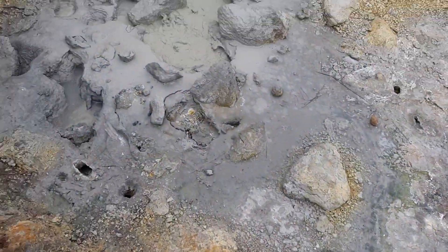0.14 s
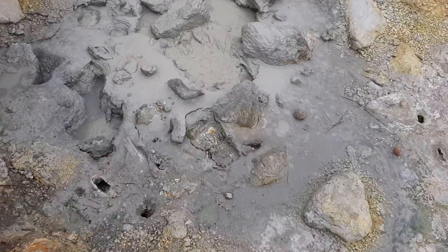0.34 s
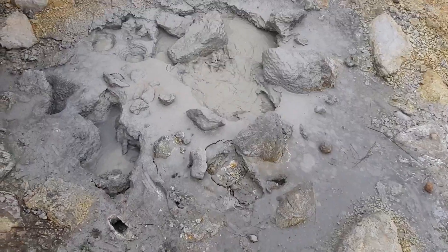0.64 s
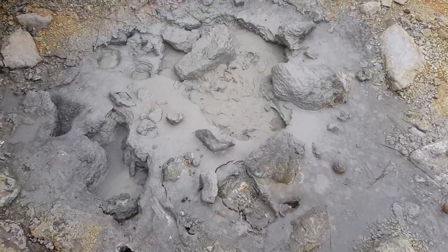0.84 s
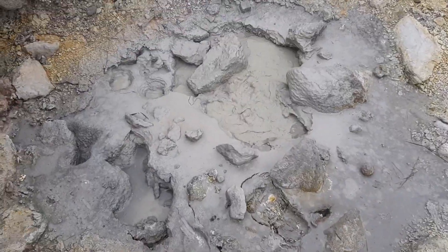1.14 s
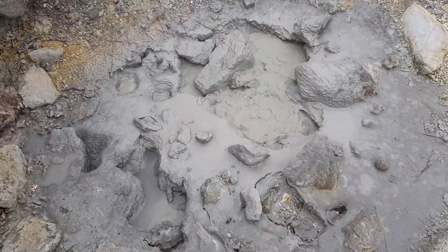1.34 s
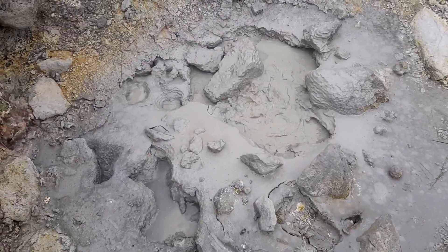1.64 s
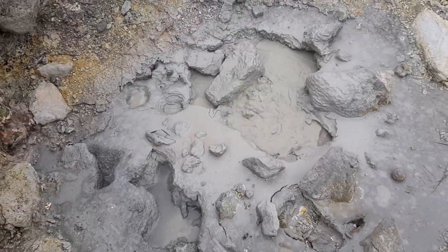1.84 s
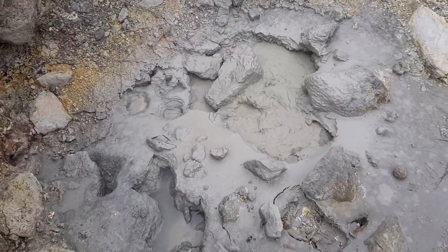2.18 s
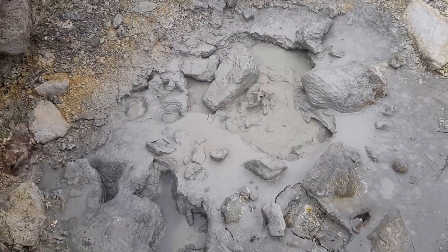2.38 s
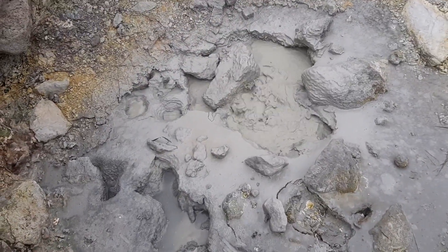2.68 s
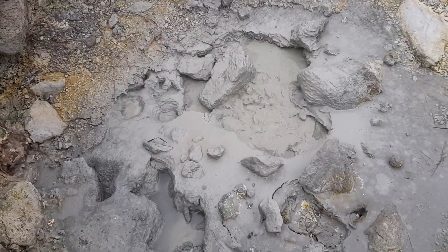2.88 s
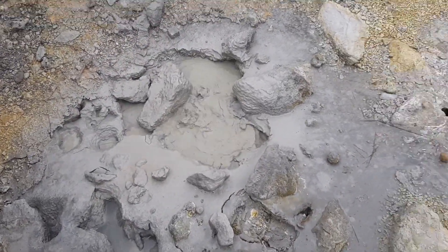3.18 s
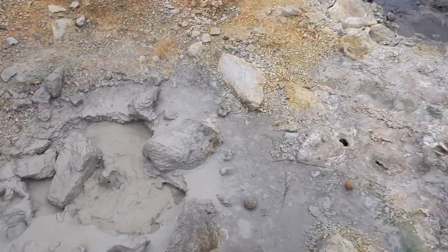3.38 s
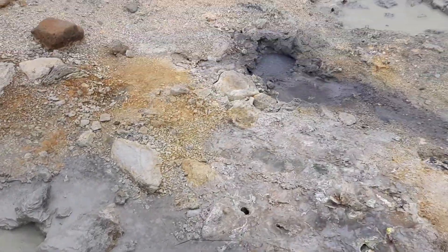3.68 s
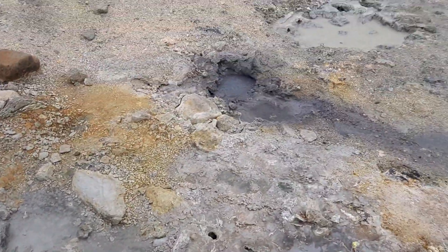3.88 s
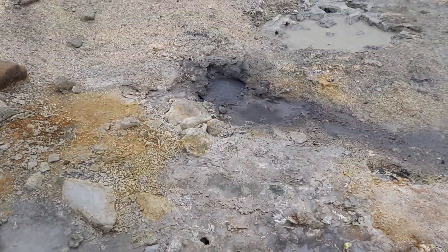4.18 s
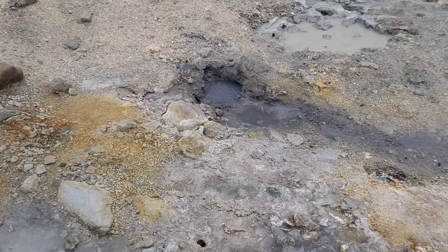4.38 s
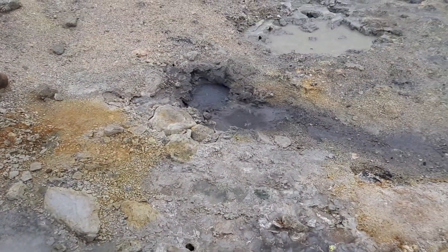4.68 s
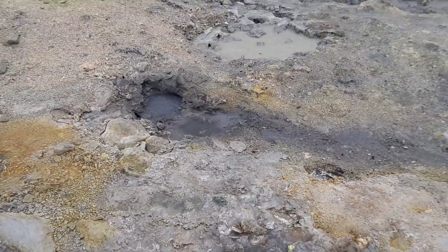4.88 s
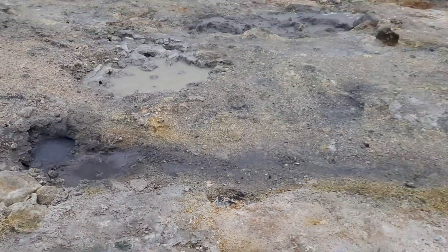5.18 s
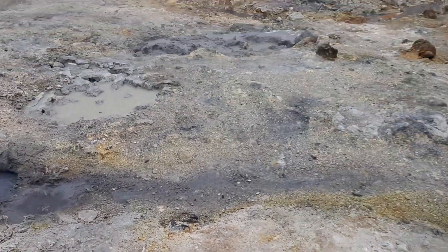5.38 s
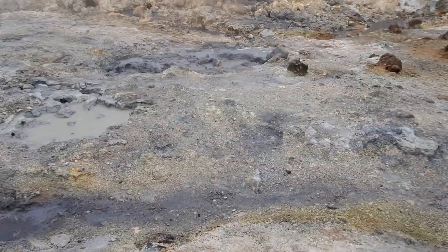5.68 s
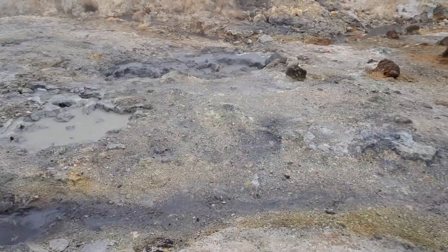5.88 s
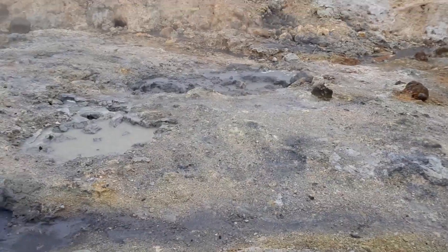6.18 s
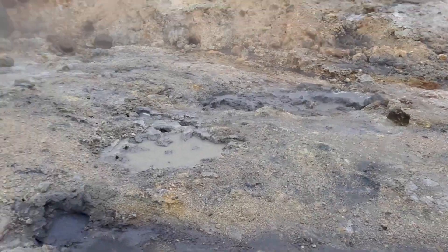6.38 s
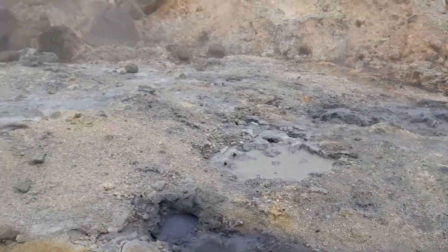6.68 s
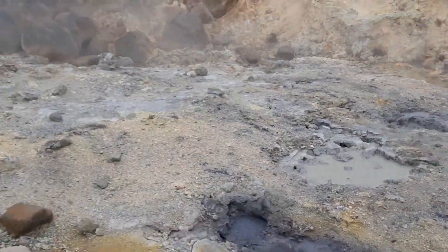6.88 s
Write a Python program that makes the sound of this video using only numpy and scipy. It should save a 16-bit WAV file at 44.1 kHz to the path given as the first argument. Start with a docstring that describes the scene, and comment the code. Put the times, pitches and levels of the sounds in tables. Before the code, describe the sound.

Steam vents rumble steadily outdoors while steam fizzes through wet mud and far jets hiss faintly. Gusts buffet the left side of a handheld microphone early on, as low plops give way to scattered pops and small splatters. A big bubble cracks loudly near the middle, followed by a flurry of crisp, higher snaps on the right. More wind bumps the right side as the mud keeps boiling.

```python
"""Mud pots boil in an open steam field: bubbles plop, pop and crack, and wet mud spatters.
Steam fizzes through the mud and rings in its hollows, over a deep vent roar and under the hiss
of far jets. A turning handheld microphone hears it through two ports; the left one faces away.
Gusts of wind thump mostly on the left port at first, later mostly on the right."""
import sys
import numpy as np
from scipy import signal
from scipy.fft import rfft, irfft
from scipy.io import wavfile
from scipy.ndimage import uniform_filter1d

SR = 44100
rng = np.random.default_rng(int(sys.argv[2]) if len(sys.argv) > 2 else 0)


def generate_wav(signal):
    """Clip the signal to [-1, 1] and save it as 16-bit WAV at the path in sys.argv[1]."""
    frames = np.transpose(np.atleast_2d(signal))
    scaled = np.clip(frames, -1, 1) * 32767
    pcm = np.round(scaled).astype(np.int16)
    wavfile.write(sys.argv[1], SR, pcm)


N = 310023
TIME_S = np.arange(N) / SR
RING_SAMPLES = 1200


def gain_of(db):
    """Decibels to amplitude."""
    return 10 ** (np.asarray(db) / 20)


def port_gains(db, left_db):
    """Left and right gains, the left offset by left_db."""
    return gain_of(db + np.array([[left_db], [0]]))


def unit_rms(x):
    """Scale to rms 1."""
    return x / np.sqrt(np.mean(x ** 2) + 1e-20)


def wander(shape, steps):
    """Smoothed random drift, rms 1."""
    return unit_rms(uniform_filter1d(rng.standard_normal(shape), steps))


def at_hz(table, hz):
    """Interpolate a table over log frequency."""
    f, value = np.transpose(table)
    return np.interp(np.log(hz + 1), np.log(f + 1), value)


def at_time(table, column, t):
    """Interpolate one column over time."""
    rows = np.array(table)
    return np.interp(t, rows[:, 0], rows[:, column])


def band(x, hz, width_hz):
    """Band-pass, rms 1."""
    edges_hz = np.clip([hz - width_hz / 2, hz + width_hz / 2], 40, SR / 2.2)
    return unit_rms(signal.sosfilt(signal.butter(3, edges_hz, "band", fs=SR, output="sos"), x))


def port_noise(size, colour_db, patchy_db, flicker_db, coherence=None, lead_s=0):
    """Two-port noise shaped by colour_db(hz, t), with drifting patches and flicker; right rms 1."""
    hop = size // 4
    frames, hz = N // hop + 5, np.fft.rfftfreq(size, 1 / SR)
    a, b, c, d, patches = rng.standard_normal((frames, len(hz), 5)).T
    patches = unit_rms(uniform_filter1d(uniform_filter1d(patches, 9, axis=0), 9, axis=1))
    flicker = wander(frames, 5)
    shared = 0 if coherence is None else at_hz(coherence, hz)[:, None]
    right, unrelated = a + 1j * b, c + 1j * d
    early = right * np.exp(2j * np.pi * hz * lead_s)[:, None]
    spectra = np.array([shared * early + np.sqrt(1 - shared ** 2) * unrelated, right])
    level_db = colour_db(hz[:, None], np.arange(frames) * hop / SR)
    spectra *= gain_of(level_db + patchy_db * patches + flicker_db * flicker)
    out = signal.istft(spectra, nperseg=size, noverlap=size - hop)[1][:, :N]
    return out / np.sqrt(np.mean(out[1] ** 2))


def resonance(offset_hz, width_hz):
    """Resonance curve, peak 1."""
    return 1 / (1 + (2 * offset_hz / width_hz) ** 2)


def burst(hz, width_hz, length_s, grit):
    """A bubble wall snaps: a few cycles swell and die; long, wide bursts tear into spray."""
    t = np.arange(len(grit)) / SR
    snap, tear = t * width_hz * 2.05, 2 * t / length_s
    torn = np.clip((width_hz * length_s - 2.2) / 2, 0, 1)
    ring = (1 - 0.62 * torn) * snap ** 2 * np.exp(2 - 2 * snap) * np.sin(2 * np.pi * hz * t)
    spray = band(grit, hz, 1.87 * width_hz)
    trail = 0.08 * np.minimum(snap, 1) * np.exp(-t / 0.0078)
    return ring + spray * (0.27 * torn * tear * np.exp(1 - tear) + trail)


# Roar spectrum: f/Hz, level/dB
ROAR_SPECTRUM = [(25, 5.5), (50, -11.5), (100, 1.5), (180, -3.5), (260, -0.5), (330, -7), (400, -6),
                 (520, -12.5), (800, -15), (980, -19.5), (1120, -26.5), (1400, -33), (2500, -48.5)]
# Roar likeness between ports: f/Hz, coherence
ROAR_COHERENCE = [(60, 0.88), (130, 0.99), (290, 0.93), (640, 0.37), (1400, 0.077)]
# Roar while turning: t/s, middle boost/dB, upper boost/dB
ROAR_TURN = [(0, 4.5, 0), (.3, -1, 1.5), (1.2, 1.5, 1), (1.8, 3, 1.5), (3.2, 3.5, 0.5), (3.6, 0, 4.5),
             (5, 0.5, 5.5), (5.6, 0, 5.5), (6.5, -0.5, 5), (7.03, 0, 6)]
# Ringing of the hollows: t/s, fizz resonance strength, roar boost at 900 Hz/dB
HOLLOW_STRENGTH = [(0, 0.5, 6.5), (.6, 0.7, 4.5), (1.2, 0.6, 5), (1.6, 0.83, 1.5), (2.6, 0.9, 1.5),
                   (3.3, 0.77, -0.5), (4.2, 1.02, -2.5), (5, 0.9, 0), (6, 0.92, -2.5), (7.03, 1, 1.5)]
def vent_roar():
    """Vents roar low; the middle and upper bands shift as the microphone turns."""
    def colour_db(hz, t):
        upper = 1 / (1 + (520 / (hz + 1)) ** 6)
        middle = 1 - upper - 1 / (1 + (hz / 220) ** 6)
        turn_db = at_time(ROAR_TURN, 1, t) * middle + at_time(ROAR_TURN, 2, t) * upper
        hollow_db = at_time(HOLLOW_STRENGTH, 2, t) * np.exp(-(2 * (hz - 900) / 280) ** 2)
        return at_hz(ROAR_SPECTRUM, hz) + turn_db + hollow_db
    roar = port_noise(1024, colour_db, patchy_db=1, flicker_db=0.35,
                      coherence=ROAR_COHERENCE, lead_s=4 / SR)
    return roar * port_gains(-33.5, left_db=-2.5)


LEFT_LEAD_SAMPLES = 14
# Fizz spectrum: f/Hz, level/dB
FIZZ_SPECTRUM = [(500, -14), (1100, -1.5), (2500, 2), (3300, -3), (4300, 0.5), (6200, -1), (7200, -11.5),
                 (9000, -30), (12000, -54)]
# Fizz likeness between ports: f/Hz, coherence
FIZZ_COHERENCE = [(1000, 0.17), (2000, 0.28), (3500, 0.038), (7000, 0.022)]
# Resonances of the hollows: f/Hz, width/Hz, gain/dB
HOLLOW_MODES = [(1535, 42, 8.5), (2026, 65, 7.5), (2770, 100, 2.5), (6120, 920, -2.5)]
# Shading of the left port: f/Hz, left minus right/dB
LEFT_SHADE = [(900, -0.5), (1500, -5), (2400, -12.5), (4400, -10), (6000, -10), (7200, 2)]
# Vigour of the boil: t/s, fizz level/dB, jet level/dB
BOIL_LEVELS = [(0, -44.5, -59), (.39, -44.5, -60.5), (.74, -43.5, -57.5), (.95, -45, -58.5),
               (1.3, -46, -57.5), (1.45, -44, -58), (1.94, -45, -59.5), (2.58, -43, -57.5),
               (3.09, -45, -58), (3.58, -42, -59), (3.75, -41, -55.5), (4.19, -42.5, -57),
               (4.62, -42, -56.5), (5.5, -42.5, -56), (6.03, -42.5, -58), (6.56, -42, -57),
               (7.03, -43, -58)]
def steam_fizz():
    """Steam through wet mud: dense resonant hiss and tiny bubbles, shaded at the left port."""
    def colour_db(hz, t):
        drifts, flutters = wander((2, len(HOLLOW_MODES), len(t)), 7)
        modes_db = sum(db * (1 + 0.5 * flutter) * resonance(hz - f * (1 + 0.012 * drift), width_hz)
                       for (f, width_hz, db), drift, flutter in zip(HOLLOW_MODES, drifts, flutters))
        shade_db = np.array([at_hz(LEFT_SHADE, hz), 0 * hz])
        return at_hz(FIZZ_SPECTRUM, hz) + at_time(HOLLOW_STRENGTH, 1, t) * modes_db + shade_db
    steam = port_noise(2048, colour_db, patchy_db=1.2, flicker_db=0.35,
                       coherence=FIZZ_COHERENCE, lead_s=LEFT_LEAD_SAMPLES / SR)
    sizes = gain_of(6.5 * np.minimum(rng.exponential(1, N), 2.4))
    onsets = sizes * (rng.random(N) < 400 / SR)  # 400 bubbles/s
    pitch_index, grit = rng.integers(0, 16, N), rng.standard_normal((16, 700))
    bubbles = np.zeros((2, N))
    for k, hz in enumerate(np.geomspace(700, 5500, 16)):
        bubble = burst(hz, width_hz=880, length_s=0.00099, grit=grit[k])
        train = signal.oaconvolve(onsets * (pitch_index == k), bubble)[:N]
        bubbles += [gain_of(at_hz(LEFT_SHADE, hz)) * np.roll(train, -LEFT_LEAD_SAMPLES), train]
    return (steam + gain_of(-10) * unit_rms(bubbles)) * gain_of(at_time(BOIL_LEVELS, 1, TIME_S))


# Jet spectrum: f/Hz, level/dB
JET_SPECTRUM = [(5000, -26), (8000, -10.5), (11500, 4), (13500, 1), (15800, -3.5)]
# Steam puffs: t/s, length/s, level/dB, f/Hz, left minus right/dB
STEAM_PUFFS = [(.7, .09, -59, 12000, 0), (1.2, 0.18, -57, 12500, 1), (2.42, 0.084, -56, 13200, -16),
               (3.666, 0.089, -48.5, 13000, -16)]
def steam_jets():
    """Far jets hiss from all around; small holes let out short puffs."""
    hiss = port_noise(256, lambda hz, t: at_hz(JET_SPECTRUM, hz), patchy_db=1.8, flicker_db=0.45)
    out = hiss * gain_of(at_time(BOIL_LEVELS, 2, TIME_S))
    for start_s, length_s, db, hz, left_db in STEAM_PUFFS:
        puff = band(rng.standard_normal((2, N)), hz, width_hz=4000)
        gate = np.clip(np.minimum(TIME_S - start_s, start_s + length_s - TIME_S) / 0.008, 0, 1)
        out += port_gains(db, left_db) * puff * gate
    return out


def mud_plops(per_s, db, left_db, range_hz):
    """Slow, larger bubbles plop at random under the surface."""
    sizes = gain_of(5.4 * np.minimum(rng.exponential(1, N), 3))
    onsets = sizes * (rng.random(N) < per_s / SR)
    pitch_index, grit = rng.integers(0, 8, N), rng.standard_normal((8, RING_SAMPLES))
    plops = np.zeros(N)
    for k, hz in enumerate(np.geomspace(*range_hz, 8)):
        plop = burst(hz, width_hz=0.4 * hz, length_s=0.0097, grit=grit[k])
        plops += signal.oaconvolve(onsets * (pitch_index == k), plop)[:N]
    return port_gains(db, left_db) * unit_rms(plops)


# Wind thumps: centre t/s, level/dB, length/s, port L or R
WIND_THUMPS = [(0.04, -32.5, 0.098, "L"), (0.077, -33, .07, "R"), (0.215, -32, 0.075, "L"),
               (0.605, -25.5, 0.13, "L"), (0.677, -29, 0.16, "L"), (0.73, -23, 0.054, "L"),
               (0.771, -21.5, 0.078, "L"), (0.891, -18, 0.097, "L"), (0.972, -22, 0.22, "L"),
               (1.079, -15.5, 0.053, "L"), (1.123, -23, 0.049, "L"), (1.193, -35, .07, "R"),
               (1.236, -22.5, 0.09, "L"), (1.288, -21.5, 0.046, "L"), (1.485, -27, 0.26, "L"),
               (2.09, -32.5, 0.21, "R"), (3.62, -38, 0.11, "L"), (3.762, -29, .1, "R"),
               (3.81, -29, 0.11, "L"), (3.94, -34, 0.04, "R"), (4.255, -27, 0.2, "R"),
               (4.402, -33, 0.26, "L"), (4.744, -31, 0.055, "L"), (5.086, -18.5, 0.18, "R"),
               (5.143, -31, .09, "L"), (5.151, -26.5, 0.18, "R"), (5.314, -31.5, 0.16, "R"),
               (5.49, -36, 0.057, "R"), (5.748, -26.5, 0.21, "R"), (5.91, -29.5, 0.22, "R"),
               (6.092, -34.5, 0.46, "L"), (6.3, -36, 0.54, "R"), (6.56, -30, 0.16, "R"),
               (6.59, -29, 0.11, "L"), (6.673, -25.5, 0.17, "R"), (6.8, -33, 0.24, "R"),
               (6.95, -35, 0.15, "R")]
def wind_level_db(port, t, breeze_db):
    """Pressure on one port: breeze plus arched thumps, 19.5 dB down at their ends."""
    power = gain_of(2 * breeze_db)
    for centre_s, db, length_s, side in WIND_THUMPS:
        if side == port:
            arch_db = -19.5 * np.minimum(2 * abs(t - centre_s) / length_s, 3) ** 2
            power += gain_of(2 * (db + arch_db))
    return 10 * np.log10(power)


CALM_DB, PITCH_RISE_PER_DB, LEFT_PITCH_RATIO = -39, 0.018, 0.7
# Calm wind spectrum, right port: f/Hz, level/dB
WIND_SPECTRUM = [(20, 4.5), (40, 0), (70, 1.5), (110, -1.5), (160, -18), (300, -21), (600, -36),
                 (1200, -66)]
def wind():
    """Lumpy pressure, unrelated at the two ports; strong gusts sound higher."""
    t = TIME_S[::64]
    swings = unit_rms(uniform_filter1d(wander((2, len(t)), 50), 50))
    levels_db = [wind_level_db(port, t, breeze_db=-48 + 3 * swing) for port, swing in zip("LR", swings)]

    def colour_db(hz, frame_s):
        excess_db = [np.maximum(np.interp(frame_s, t, db) - CALM_DB, 0) for db in levels_db]
        left, right = np.exp(PITCH_RISE_PER_DB * np.array(excess_db))
        return np.array([at_hz(WIND_SPECTRUM, hz / pitch) for pitch in (LEFT_PITCH_RATIO * left, right)])
    lumps = port_noise(2048, colour_db, patchy_db=0.25, flicker_db=0.25)
    power = uniform_filter1d(uniform_filter1d(lumps ** 2, 2500), 2500)
    lumps /= np.sqrt(power + 1e-9)  # thumps and breeze alone set the swell
    return lumps * gain_of([np.interp(TIME_S, t, db) for db in levels_db])


# Mud slumps: centre t/s, half-length/s, level/dB, f/Hz
SLUMPS = [(0.851, 0.038, -41, 1200), (0.973, .04, -43, 1200), (1.304, 0.048, -47, 2270),
          (1.309, 0.15, -51, 5000), (1.57, 0.07, -49, 2260), (1.673, 0.049, -50, 2380),
          (1.767, 0.04, -48, 2200), (2.127, 0.1, -46, 2370), (2.154, .008, -41, 2200),
          (2.375, 0.036, -45, 1800), (2.44, 0.092, -48, 1700), (2.482, 0.058, -49, 4830),
          (2.854, 0.045, -48, 2170), (2.863, 0.019, -50, 690), (3.173, 0.058, -46, 2400),
          (3.71, 0.11, -43.5, 4220), (3.84, 0.0043, -30, 5650), (3.8787, 0.0017, -31, 5600),
          (4.249, 0.075, -44, 4000), (4.25, .06, -44, 2060), (4.537, 0.049, -43, 4600),
          (4.635, 0.052, -39, 4170), (4.825, 0.034, -52, 2210), (5.001, 0.031, -37, 1860),
          (5.021, 0.064, -46, 4350), (5.185, 0.035, -40, 1630), (5.65, 0.036, -46, 4400),
          (6.138, 0.059, -44, 1490), (6.29, 0.065, -47, 2570)]
def mud_spatter():
    """Slumping mud sprays droplets of very unequal size, too close to hear apart."""
    out = np.zeros((2, N))
    for centre_s, half_s, db, hz in SLUMPS:
        size, right_at = round(2 * half_s * SR), round((centre_s - half_s) * SR)
        left_at = right_at - LEFT_LEAD_SAMPLES
        droplets = gain_of(4.5 * wander(16000, 70)) * rng.standard_normal(16000)
        spray = gain_of(db) * band(droplets, hz, width_hz=0.72 * hz)[:size] * np.hanning(size)
        out[0, left_at:left_at + size] += gain_of(at_hz(LEFT_SHADE, hz)) * spray
        out[1, right_at:right_at + size] += spray
    return out


def damped_ring(hz, width_hz):
    """A struck resonance; wider dies sooner."""
    t = TIME_S[:RING_SAMPLES]
    return np.sin(2 * np.pi * hz * t) * np.exp(-np.pi * width_hz * t)


TICK_WIDTH_HZ, HOLLOW_DAMPING_HZ = 2000, 35
# Bursting bubbles: t/s, level/dB, f/Hz, width/Hz
BUBBLE_POPS = [(.836, -30, 960, 250), (.844, -37, 900, 220), (.856, -35, 850, 220), (.865, -38, 1000, 300),
               (.936, -29.5, 720, 220), (.965, -39, 720, 300), (.977, -35, 830, 200),
               (0.988, -29, 930, 200), (1.313, -28.5, 2200, 900), (1.4305, -31, 2490, 1100),
               (1.527, -33, 2500, 700), (1.533, -39.5, 2030, 200), (1.564, -29, 2500, 2000),
               (1.59, -33, 1900, 1200), (1.609, -28, 2300, 2200), (1.653, -26.5, 2120, 1000),
               (1.668, -32, 2600, 700), (1.685, -27, 2490, 800), (1.751, -35, 2600, 600),
               (1.761, -28, 1710, 600), (1.777, -32, 2100, 800), (2.069, -27, 1300, 1500),
               (2.098, -27.5, 1900, 1800), (2.124, -39, 2850, 500), (2.15, -24, 2880, 1800),
               (2.1515, -26, 4200, 1800), (2.222, -31, 2010, 500), (2.363, -30.5, 1680, 400),
               (2.433, -28, 2300, 1000), (2.84, -30, 2300, 800), (2.849, -26, 2000, 900),
               (2.858, -32, 696, 150), (2.907, -27.5, 2600, 1800), (3.2, -24.5, 2700, 1100),
               (3.603, -34, 960, 200), (3.612, -33, 900, 180), (3.626, -33, 860, 200),
               (3.621, -33, 2650, 600), (3.6696, -26, 1500, 1500), (3.6915, -24, 3490, 3300),
               (3.7374, -26, 2340, 1100), (3.7499, -24.5, 900, 600), (3.786, -32, 2930, 700),
               (3.813, -27, 800, 280), (3.847, -29, 840, 300), (3.862, -31, 770, 250),
               (3.8776, -28, 1900, 1500), (3.939, -21.5, 119, 70), (4.212, -22, 4370, 800),
               (4.244, -30.5, 2100, 300), (4.245, -22, 4600, 2000), (4.259, -23.5, 4300, 1400),
               (4.2684, -23, 4430, 1600), (4.3813, -30, 2230, 600), (4.4382, -29, 4250, 1900),
               (4.519, -30, 2200, 600), (4.5242, -24, 4200, 1900), (4.535, -20, 4700, 1700),
               (4.544, -23, 5100, 1700), (4.553, -22, 3300, 2000), (4.583, -13.5, 4220, 1400),
               (4.6233, -20, 4430, 2820), (4.632, -28, 4480, 1600), (4.642, -29, 4020, 2400),
               (4.649, -22, 4130, 800), (4.674, -26, 3300, 2500), (4.83, -20, 2430, 1100),
               (4.93, -27.5, 5330, 1590), (4.993, -26, 1610, 1400), (5.008, -24, 2370, 2100),
               (5.013, -23, 4200, 2000), (5.0227, -26, 4980, 1700), (5.178, -26, 845, 250),
               (5.18, -32, 1240, 800), (5.1866, -26, 1860, 1100), (5.223, -26, 4030, 1100),
               (5.653, -22.5, 4450, 1200), (6.125, -31, 900, 300), (6.138, -31, 1020, 347),
               (6.293, -18.5, 2880, 720), (6.5717, -22, 3870, 1400), (6.614, -32, 1370, 900),
               (6.676, -28, 4150, 1100), (6.777, -14.5, 4070, 1250)]
# Shading of bursts: f/Hz, left minus right/dB
BURST_SHADE = [(120, -3), (750, -2), (1100, -5), (1700, -12), (2400, -14), (4400, -19)]
# Flung droplets: t/s, level/dB, f/Hz, left minus right/dB
DROPLET_TICKS = [(1.7148, -46, 13150, 14), (2.849, -42, 12020, 3), (3.576, -56, 11840, 24),
                 (3.7494, -48, 13160, -32), (3.878, -49, 11200, 12), (4.6238, -40, 12000, 11),
                 (4.6394, -39, 11500, 4), (4.8154, -50, 13340, 14), (6.798, -38, 12800, 0)]
def pops_and_ticks():
    """Bubbles burst and flung droplets tick; each stirs the hollows near its pitch."""
    out = np.zeros((2, N + RING_SAMPLES))
    events = [(t, db, hz, width_hz, at_hz(BURST_SHADE, hz)) for t, db, hz, width_hz in BUBBLE_POPS]
    events += [(t, db, hz, TICK_WIDTH_HZ, left_db) for t, db, hz, left_db in DROPLET_TICKS]
    for start_s, db, hz, width_hz, left_db in events:
        pop = burst(hz, width_hz, length_s=2.83 / width_hz, grit=rng.standard_normal(RING_SAMPLES))
        hollows = sum(damped_ring(f, mode_width_hz + HOLLOW_DAMPING_HZ) * resonance(hz - f, width_hz)
                      for f, mode_width_hz, _ in HOLLOW_MODES)
        at = round(start_s * SR)
        out[:, at:at + RING_SAMPLES] += port_gains(db, left_db) * (pop + 0.17 * hollows)
    return out[:, :N]


CRACK_RISE_S, LEFT_LAG_S, OVERTONE_RATIO, WIDTH_RATIO = 0.00017, 0.0003, 1.85, 0.27
# Largest bubbles: t/s, level/dB, f/Hz, relative overtone level/dB
BUBBLE_CRACKS = [(2.4219, -16, 1350, -18), (2.4612, -15.5, 1550, -18), (3.75015, -5, 1700, 0)]
def bubble_cracks():
    """A large bubble opens at once, rings for a few cycles and stirs the two narrowest hollows."""
    out = np.zeros((2, N))
    opening = 1 - np.exp(-(TIME_S[:RING_SAMPLES] / CRACK_RISE_S) ** 2)
    for start_s, db, hz, overtone_db in BUBBLE_CRACKS:
        right_at = round(start_s * SR)
        left_at = right_at + round(LEFT_LAG_S * SR)
        overtone_hz = OVERTONE_RATIO * hz
        modes = [(hz, WIDTH_RATIO * hz, 1), (overtone_hz, WIDTH_RATIO * overtone_hz, -gain_of(overtone_db))]
        modes += [(f, width_hz, 0.055) for f, width_hz, _ in HOLLOW_MODES[:2]]
        for f, width_hz, share in modes:
            ring = share * gain_of(db) * damped_ring(f, width_hz) * opening
            out[0, left_at:left_at + RING_SAMPLES] += gain_of(at_hz(BURST_SHADE, f)) * ring
            out[1, right_at:right_at + RING_SAMPLES] += ring
    return out


def scene():
    """All sources at the two ports."""
    gurgles = mud_plops(per_s=25, db=-53.5, left_db=-1.5, range_hz=(450, 1050))
    thick_mud = mud_plops(per_s=14, db=-50, left_db=-2.5, range_hz=(170, 450))
    bed = gurgles + thick_mud + wind() + vent_roar() + steam_fizz()
    return bed + mud_spatter() + steam_jets() + pops_and_ticks() + bubble_cracks()


LOW_CUT_HZ, BAND_LIMIT_HZ = 60.3, 15770
NOTCH_HZ, NOTCH_WIDTH_HZ, NOTCH_DB = 8505, 470, -16
def record(dry):
    """Microphone: low cut against wind, a notch where the ports cancel, band limit."""
    hz, fft_size = np.fft.rfftfreq(N, 1 / SR), 2 ** 19
    low_cut = 1 / np.sqrt(1 + (LOW_CUT_HZ / (hz + 1)) ** 6)
    notch = gain_of(NOTCH_DB * np.exp(-((hz - NOTCH_HZ) / NOTCH_WIDTH_HZ) ** 2))
    response = np.interp(np.fft.rfftfreq(fft_size, 1 / SR), hz, low_cut * notch)
    coloured = irfft(rfft(dry, fft_size) * response)[:, :N]
    low_pass = signal.firwin(1601, BAND_LIMIT_HZ, window=("kaiser", 10), fs=SR)
    return signal.oaconvolve(coloured, low_pass[None], "same")


dry = scene()
out = record(dry)
generate_wav(out)
```